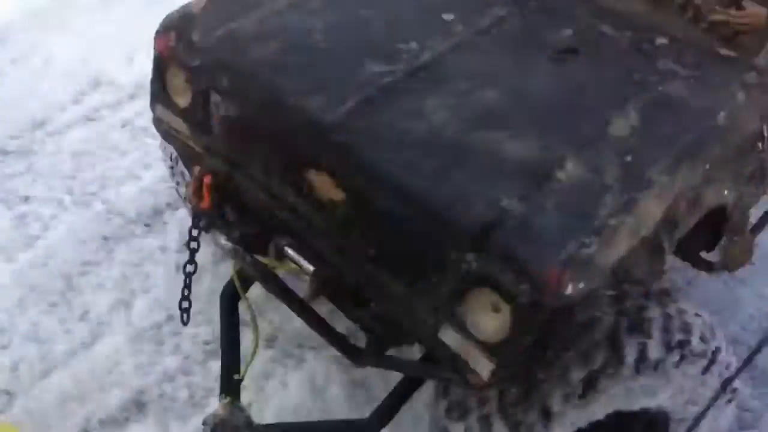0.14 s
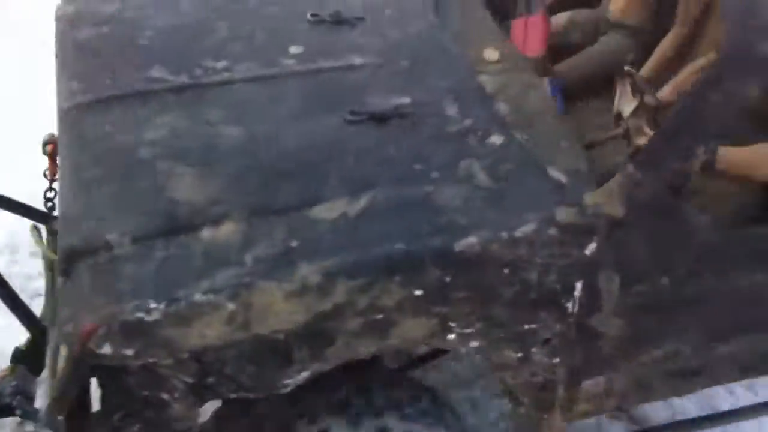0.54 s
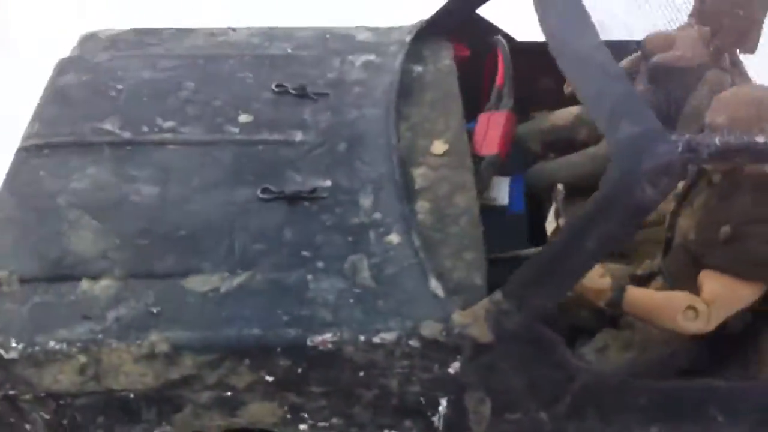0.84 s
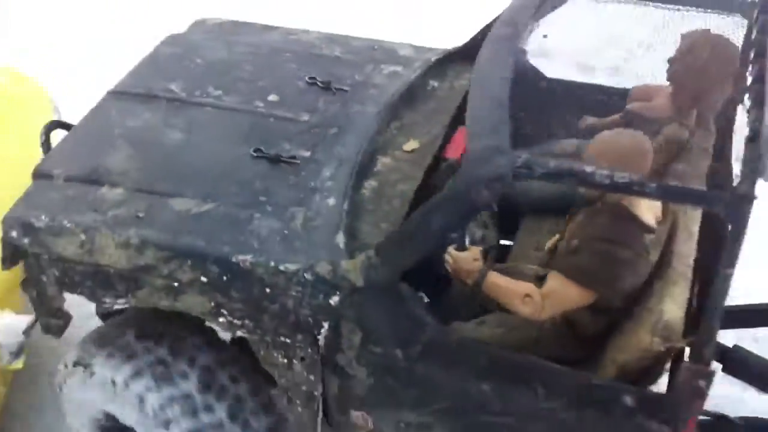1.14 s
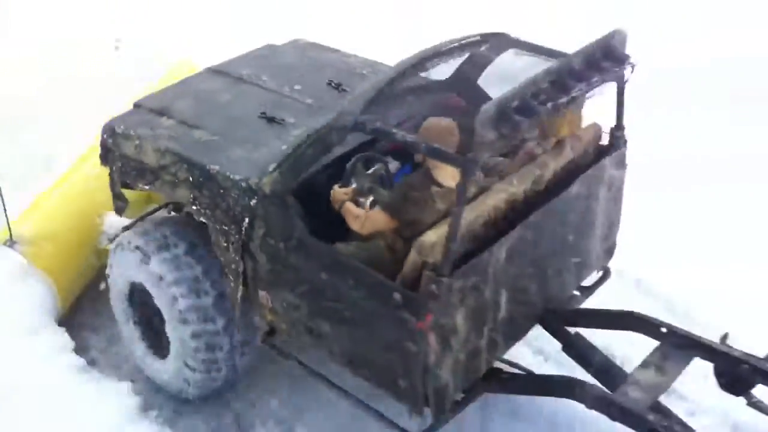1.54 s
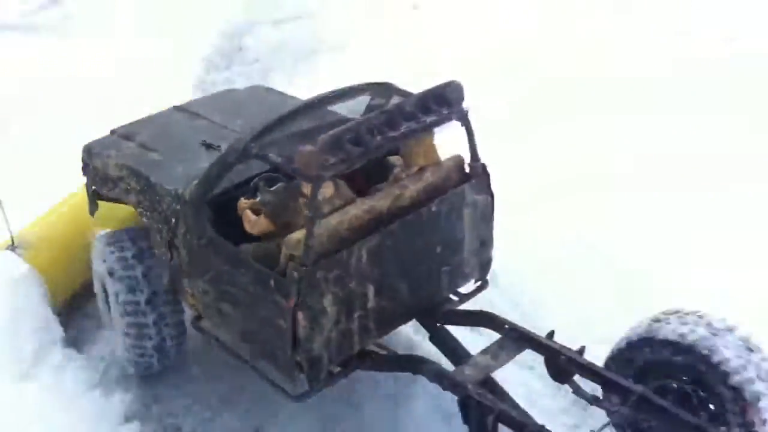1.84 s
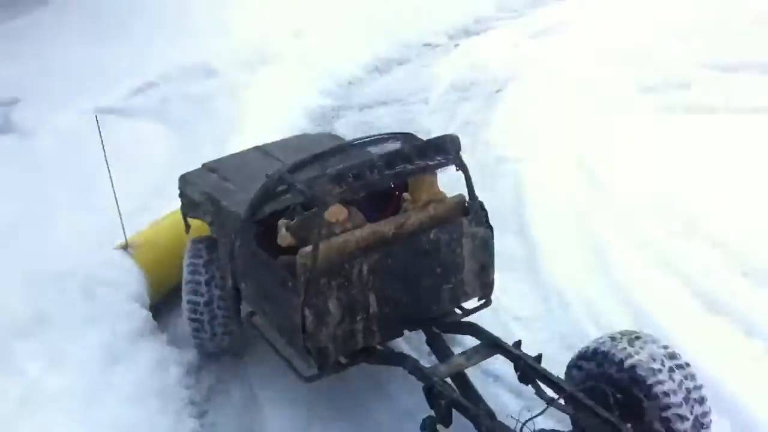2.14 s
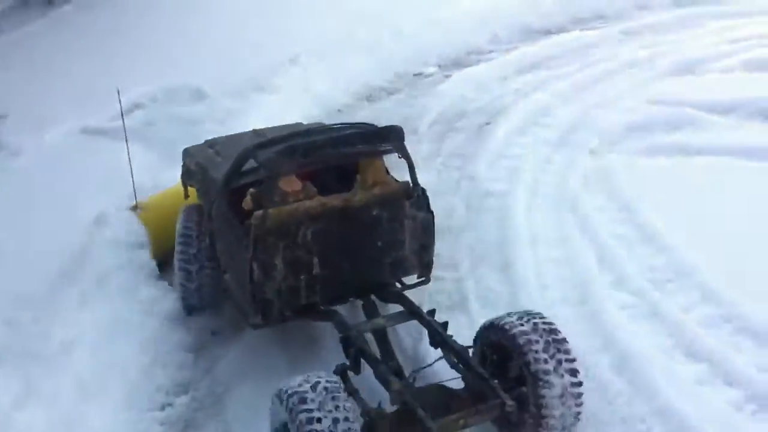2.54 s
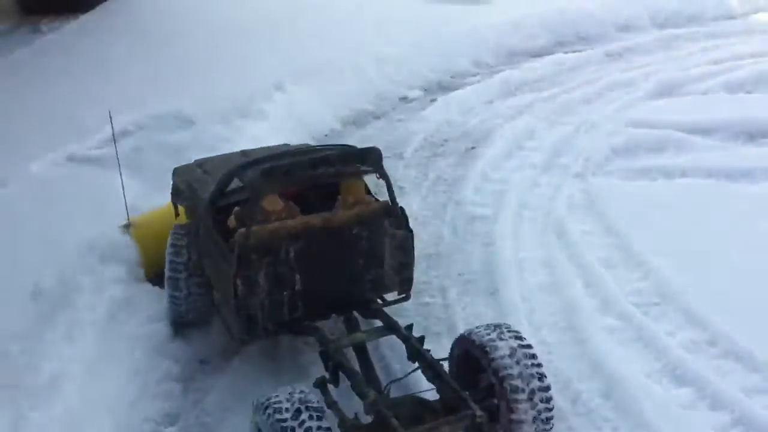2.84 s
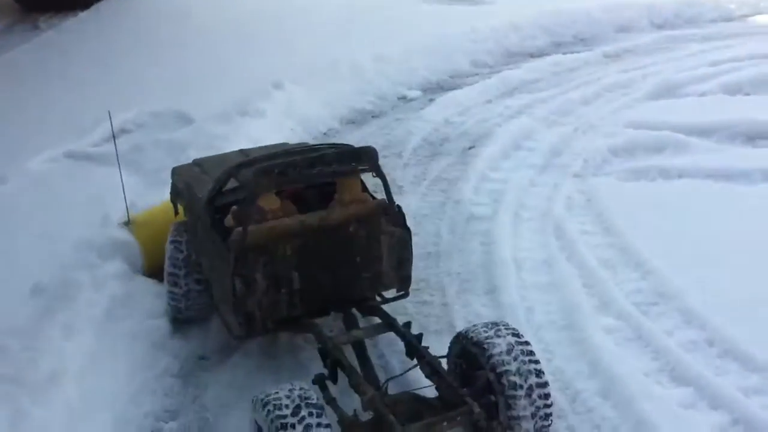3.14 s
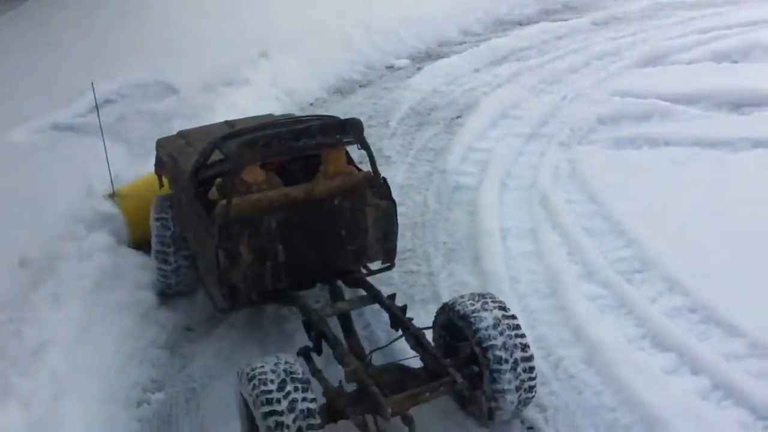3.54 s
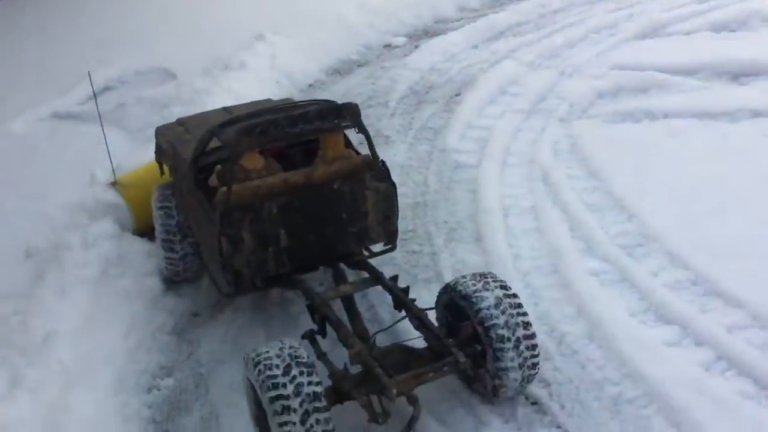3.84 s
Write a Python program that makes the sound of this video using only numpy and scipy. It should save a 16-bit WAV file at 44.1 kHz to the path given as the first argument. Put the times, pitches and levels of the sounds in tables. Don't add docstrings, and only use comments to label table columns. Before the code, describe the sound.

Outdoors, a steel blade grates in uneven lurches across crunchy snow with small knocks and a gear whir beneath; scraping fades, a short near-silence follows, then gears tick and the little motor spins up.

```python
import sys
import numpy as np
from scipy import signal
from scipy.fft import rfft, irfft, next_fast_len
from scipy.io import wavfile
from scipy.ndimage import uniform_filter1d, map_coordinates

SR = 44100
rng = np.random.default_rng(int(sys.argv[2]) if len(sys.argv) > 2 else 0)


def inscribe(sig):
    pcm = np.round(np.clip(np.atleast_2d(sig).T, -1, 1) * 32767)
    wavfile.write(sys.argv[1], SR, pcm.astype(np.int16))


def gain_from_decibels(decibels):
    exponent = np.asarray(decibels, float) / 20
    return 10 ** exponent


N = 176400

# (time [s], scrape [dB], crunch [dB], facing [-1 head-on, 0 front, 1 side, 2 quarter, 3 rear])
BLADE_PATH = [(0, -33, -38, -1), (.25, -36.5, -39, 0.7), (.75, -31.5, -39.5, -0.5),
              (.9, -28.5, -40.5, 1.05), (1.1, -28, -41, 1.5), (1.35, -28.5, -42, 2.33),
              (1.56, -33.5, -45, 2.5), (1.68, -30.5, -41.5, 8), (2.1, -35.5, -43.5, 3),
              (2.4, -33.5, -46, 3), (2.7, -39.5, -48, 3), (2.84, -50, -63.5, 3), (2.98, -38, -51.5, 5.5),
              (3.11, -43.5, -70.5, -0.5), (3.35, -43, -57.5, 3.5), (3.39, -81, -73.5, 4)]
# (time [s], swell [dB], length [s])
LURCHES = [(.172, 2, 0.068), (.288, 3, 0.035), (.36, 5.5, 0.037), (.439, 2.5, 0.026), (.531, 3.5, 0.014),
           (.609, 3, 0.11), (.759, 7, 0.014), (.832, 3.5, 0.031), (.9, -8, 0.017), (1.062, 2, 0.03),
           (1.142, 6, 0.012), (1.252, 2.5, 0.025), (1.34, -2, 0.041), (1.393, 2, 0.016), (1.483, 5, 0.026),
           (1.562, 6, 0.04), (1.636, 7, 0.017), (1.752, 3.5, 0.0033), (1.438, 0, .006), (1.785, 3, 0.012),
           (1.872, 2.5, 0.031), (1.946, 5.5, 0.029), (2.04, 6, 0.035), (2.235, 4, 0.062),
           (2.292, -2, 0.011), (2.348, 2, 0.03), (2.479, 6.5, 0.014), (2.62, 6.5, 0.013),
           (2.656, 7.5, 0.053), (2.769, 9.5, 0.068), (2.904, 15, 0.11)]
# (time [s], dip [dB], length [s])
SKIPS = [(.31, -3.5, 0.02), (.575, -7, 0.02), (.89, -4, 0.077), (1.195, -5.5, 0.022), (1.426, -10, 0.014),
         (1.6, -11, 0.0067), (1.84, -5.5, 0.022), (2.11, -6.5, 0.019), (2.2, -5.5, 0.028),
         (2.714, -11, 0.01), (3.125, -7.5, 0.013)]
# (frequency [Hz], width [Hz], level [dB])
BODY_HEAD_ON = [(480, 220, -5), (1810, 160, -1), (2470, 200, -3), (3240, 380, 0), (5200, 700, -4)]
BODY_FRONT = [(480, 220, -6.5), (1500, 300, -4), (1830, 140, 1.5), (2610, 250, -2.5), (2980, 260, -1.5),
              (3400, 300, -2), (4200, 500, -3), (5520, 400, -5)]
BODY_SIDE = [(1450, 200, -3), (1840, 90, -.5), (2450, 300, 0), (3000, 650, 0), (4110, 450, -1.5)]
BODY_QUARTER = [(500, 140, -7), (1800, 120, -.5), (2400, 250, -1), (2900, 420, -.5), (3500, 300, -1),
                (4180, 400, 0)]
BODY_REAR = [(495, 120, -4.8), (880, 80, -2.5), (1830, 260, .3), (2150, 100, -5), (3270, 380, 1.5),
             (4300, 200, -2.5), (5360, 300, -4), (6610, 350, -4)]
# (frequency [Hz], level [dB])
GRIT_COLOUR = [(530, -19), (900, -14), (2210, -4.5), (3320, -3), (4210, -9.5), (7950, -11), (15700, -21.5)]
# (frequency [Hz], level [dB])
SNOW_COLOUR = [(110, -15), (190, -1), (380, -2.5), (500, -2), (900, -5), (1600, -5), (2500, -23)]
# (time [s], level [dB])
MOTOR_LEVEL = [(0, -34), (.6, -37.5), (1.2, -43), (1.9, -34.5), (2.6, -38.5), (2.85, -46.5), (3.12, -35),
               (3.14, -31), (3.2, -33), (3.32, -33.5), (3.365, -58), (3.375, -79), (3.505, -86),
               (3.515, -61.5), (3.6, -47), (3.64, -33), (3.82, -32.5), (4, -35.5)]
# (time [s], speed [turns/s], pinion whine [dB under whir], mesh whine [dB under whir])
SHAFT = [(0, 105, -40, -40), (2.85, 100, -40, -40), (3.11, 118, -40, -24), (3.14, 130, -33, -9),
         (3.18, 140, -30, -6), (3.22, 139, -30, -6), (3.3, 122, -31, -12), (3.365, 80, -36, -36),
         (3.505, 20, -40, -40), (3.6, 78, -30, -20), (3.65, 92, -24, -16), (3.7, 104, -24, -19),
         (3.77, 126, -24, -30), (3.87, 131, -23, -32), (4, 127, -29, -34)]
# (frequency [Hz], level [dB])
WHIR_COLOUR = [(150, -33), (1000, -17), (2300, -15.5), (3200, 0.5), (4500, -10), (6500, -1.5),
               (10000, -8.5), (15700, -19)]
# (frequency [Hz], width [Hz], level [dB])
GEARBOX = [(1817, 100, 4), (3350, 410, 9.5), (5220, 410, 8), (6670, 810, -28)]
# (frequency [Hz], width [Hz], level [dB])
CHASSIS = [(400, 300, -3), (880, 77, 5.5), (1540, 370, 3)]
# (time [s], level [dB])
GEAR_TICKS = [
    (3.364, -56),
    (3.512, -66),
    (3.525, -62),
    (3.541, -57.5),
    (3.559, -51),
    (3.573, -51),
    (3.587, -48),
    (3.603, -49),
    (3.616, -43),
    (3.631, -45.5),
]
# (frequency [Hz], level [dB], t60 [s])
BLADE_MODES = [(852, -15.5, 0.23), (1840, -12, 1), (2457, -4, 0.29)]
# (frequency [Hz], level [dB], t60 [s])
JOLT_MODES = [(614, -32, .6), (877, -21, .9), (1863, -27, .3), (2439, -1, .24), (2702, -9, .28)]
# (frequency [Hz], level [dB])
AIR_COLOUR = [(25, -15), (80, -7.5), (240, -5), (800, -18), (1500, -19), (4000, -22), (15700, -27.5)]
# (time [s], peak [dB], pitch [Hz])
STONE_CATCHES = [(0.0164, -18, 2880), (0.0348, -16, 3220), (0.0972, -18, 3220), (0.2823, -18, 2820),
                 (0.3157, -17, 2980), (0.3551, -16, 2980), (0.4115, -18, 1770), (0.5826, -18, 2930),
                 (0.6709, -16, 2630), (0.7262, -16, 3030), (0.7527, -12, 1820), (0.8969, -17, 2790),
                 (0.9183, -17, 2330), (1.057, -10, 3160), (1.2042, -12, 2220), (1.3359, -12, 2920),
                 (1.3723, -13, 2960), (1.4351, -15, 4170), (1.5389, -14, 3580), (1.5579, -14, 2730),
                 (1.6182, -16, 3680), (1.6332, -11, 3260), (1.7504, -17, 3320), (1.8462, -18, 3250),
                 (1.8627, -15, 3250), (1.945, -14, 3110), (2.0088, -17, 3420), (2.0353, -14, 3310),
                 (2.0931, -21, 3520), (2.1206, -18, 3000), (2.2253, -15, 3210), (2.2892, -19, 3100),
                 (2.3211, -18, 3330), (2.3461, -15, 3340), (2.4179, -20, 3290), (2.611, -18, 3260),
                 (2.6554, -15, 3230), (2.7222, -22, 3270), (2.7566, -22, 3360), (2.8574, -20, 2830),
                 (2.9018, -13, 3070), (3.1313, -21, 3310), (3.1388, -19, 3200)]
# (time [s], level [dB])
MIC_BUMPS = [
    (.58, -70),
    (1.44, -69),
    (2.13, -69),
    (2.235, -62),
    (2.88, -68),
]
# (time [s], level [dB], pitch [Hz])
SNOW_LUMPS = [
    (1.144, -28, 357),
    (2.018, -20, 530),
    (2.037, -24, 230),
    (2.23, -29, 330),
    (2.631, -29.5, 480),
    (3.006, -42, 258),
    (3.462, -62.5, 298),
]

JOLT_S, JOLT_DB = 3.293, -35.5
MIC_LOW_HZ, TOP_HZ = 185, 15870


def unit(x):
    return x / np.sqrt(np.mean(x ** 2) + 1e-20)


def curves(rows):
    s, *cols = np.transpose(rows)
    return [np.interp(np.arange(N) / SR, s, c) for c in cols]


def wobble(rate):
    knots = rng.standard_normal(size=2000)
    return map_coordinates(knots, [np.arange(N) * min(rate, 490) / SR])


def swell(rows):
    t = np.arange(N) / SR
    return sum(db * np.exp(-4 * np.log(2) * ((t - s) / length) ** 2) for s, db, length in rows)


def filtered(x, response):
    m = next_fast_len(N + SR)
    return irfft(rfft(x, m) * response(np.fft.rfftfreq(m, 1 / SR)), m)[:N]


def colour(points):
    low, high = (points[0][0] / 2, -60), (points[-1][0] * 2, -60)
    f, db = np.transpose([low] + list(points) + [high])
    return lambda hz: gain_from_decibels(np.interp(np.log(hz + 1), np.log(f), db))


def peaks(rows):
    def response(f):
        total = 0
        for k, (centre, width, db) in enumerate(rows):
            damping = 1j * f * width
            total = total + (-1) ** k * gain_from_decibels(db) * damping / (centre * centre - f * f + damping)
        return total
    return response


def grains(rate, clump_db, clump_rate, spread_db, noise):
    hits = (rng.random(N) < rate / SR) * rng.standard_normal(N)
    clicks = hits * gain_from_decibels(spread_db * np.minimum(rng.exponential(size=N), 3))
    rough = unit(clicks) + noise * rng.standard_normal(N)
    clumps = gain_from_decibels(2 * clump_db * np.tanh(wobble(clump_rate) / 2))
    return unit(rough * clumps)


def shuffled(x):
    return x * np.sign(rng.standard_normal(N))


def plough():
    scrape_db, crunch_db, facing = curves(BLADE_PATH)
    lurch_db = 1.01 * swell(LURCHES) + swell(SKIPS)
    chatter = grains(4100, clump_db=2.46, clump_rate=230, spread_db=1.5, noise=0.8)
    chatter = chatter * gain_from_decibels(.8 * np.tanh(wobble(47)))

    body = np.zeros(N)
    views = [BODY_HEAD_ON, BODY_FRONT, BODY_SIDE, BODY_QUARTER, BODY_REAR]
    for k, modes in enumerate(views, start=-1):
        share = np.sqrt(np.clip(1 - abs(np.clip(facing, -1, 3) - k), 0, 1))
        ring_twice = lambda f: peaks(modes)(f) ** 2
        body += share * unit(filtered(shuffled(chatter), ring_twice))

    grit = unit(filtered(chatter, colour(GRIT_COLOUR)))
    scrape = gain_from_decibels(scrape_db + lurch_db) * (gain_from_decibels(-1.5) * body + gain_from_decibels(-0.5 - 0.11 * lurch_db) * grit)

    flakes = grains(600, clump_db=1.5, clump_rate=79, spread_db=1.4, noise=1.33)
    crunch = unit(filtered(flakes, colour(SNOW_COLOUR)))
    return scrape + gain_from_decibels(crunch_db + 0.5 * lurch_db + 1.04 * wobble(11.7)) * crunch


def motor():
    whir_db, = curves(MOTOR_LEVEL)
    speed, pinion_db, mesh_db = curves(SHAFT)
    t = np.arange(N) / SR
    turn = 2 * np.pi * np.cumsum(speed * (1 + .013 * wobble(130))) / SR

    beat_db = 3.8 * np.minimum(speed / 128, 1) ** 4 + .8 * wobble(7)
    gate = gain_from_decibels(beat_db * np.cos(turn) + .8 * np.cos(2 * turn + .7))
    rattle = grains(5000, clump_db=2.0, clump_rate=340, spread_db=0.7, noise=2.2) * gate
    open_whir = unit(filtered(rattle, colour(WHIR_COLOUR)))
    boxed_whir = unit(filtered(shuffled(rattle), peaks(GEARBOX)))
    whir = gain_from_decibels(-3.0) * open_whir + gain_from_decibels(-8.5) * boxed_whir

    top_db = mesh_db + 6 - 30 * (t < 3.5)
    orders = [(2.15, -35), (10, pinion_db), (20, mesh_db), (33, top_db)]
    whine = sum(gain_from_decibels(db + 2.8 * wobble(45)) * np.sin(k * turn) for k, db in orders)

    load_db = 1.0 * swell(LURCHES) + 0.52 * swell(SKIPS) + 0.5 * wobble(8.8)
    tick_shape = sum(gain_from_decibels(db - 60 * abs(t - s) / 0.023) * (t > s) for s, db in GEAR_TICKS)
    ticks = filtered(tick_shape * rng.standard_normal(N), peaks(GEARBOX + CHASSIS))
    return gain_from_decibels(whir_db + load_db) * (whir + whine) + 3.7 * ticks


def steel(x):
    t = np.clip(np.arange(N) / SR - JOLT_S, 0, None)
    jolt = sum(gain_from_decibels(JOLT_DB + db - 60 * t / t60) * np.sin(2 * np.pi * hz * t) for hz, db, t60 in JOLT_MODES)
    jolt = jolt * (1 - np.exp(-t / 0.0065))
    modes = [(hz, np.log(1000) / np.pi / t60, db + 18.5) for hz, db, t60 in BLADE_MODES]
    return jolt + gain_from_decibels(-13.5) * filtered(x, peaks(modes))


def yard(x):
    t = np.arange(SR // 4) / SR
    tail = signal.lfilter([.3], [1, -.7], rng.standard_normal(len(t))) * gain_from_decibels(-60 * t / .13)
    return gain_from_decibels(-14.0) * signal.fftconvolve(x, tail / np.linalg.norm(tail))[:N]


def air():
    tone_hz, tone_db, hush_db = 8700, -82.5, -72
    tone_level = gain_from_decibels(tone_db + 2.5 * wobble(20)) * np.sqrt(2)
    tone = tone_level * np.sin(2 * np.pi * tone_hz * np.arange(N) / SR)
    hush = unit(filtered(rng.standard_normal(N), colour(AIR_COLOUR)))
    return gain_from_decibels(hush_db) * hush + tone


def catches():
    t60_s, level_db, noise = .02, -4, .5
    out, t = np.zeros(N + SR), np.arange(SR // 20) / SR
    for s, db, hz in STONE_CATCHES:
        rough = np.diff(uniform_filter1d(rng.standard_normal(len(t) + 1), size=4)) * 2
        flutter = 1 + .5 * uniform_filter1d(rng.standard_normal(len(t)), size=20) * 4
        clack = np.sin(2 * np.pi * hz * t) * flutter + noise * rough
        envelope = gain_from_decibels(db + level_db - 60 * t / t60_s) * (1 - np.exp(-t / .001))
        out[round(s * SR):][:len(t)] += envelope * clack
    return out[:N]


def bumps():
    out, t = np.zeros(N), np.arange(N) / SR
    for s, db in MIC_BUMPS:
        out += gain_from_decibels(db) * np.sin(2 * np.pi * 35 * (t - s)) * np.exp(-((t - s) / .018) ** 2)
    return out


def knocks():
    out, t = np.zeros(N + SR), np.arange(SR // 10) / SR
    for s, db, hz in SNOW_LUMPS:
        thud = np.sin(2 * np.pi * hz * t) * np.exp(-hz * t / 0.99)
        crumble = .2 * gain_from_decibels(-60 * t / 0.016) * rng.standard_normal(len(t))
        out[round(s * SR):][:len(t)] += gain_from_decibels(db) * (thud + crumble)
    return out[:N]


def scene():
    truck = plough() + catches() + motor() + knocks()
    near = truck + steel(truck) + yard(truck)
    thin = lambda f: (1j * f / (MIC_LOW_HZ + 1j * f)) ** 2 * (1j * f / (120 + 1j * f))
    return (filtered(near, thin) + bumps() + air())[None]


def top_cut(x):
    return signal.sosfilt(signal.butter(12, 15870, fs=SR, output="sos"), x)


def record(dry):
    mix = filtered(dry[0], lambda hz: hz < TOP_HZ)[None]
    return top_cut(mix)


dry = scene()
out = record(dry)
inscribe(out)
```